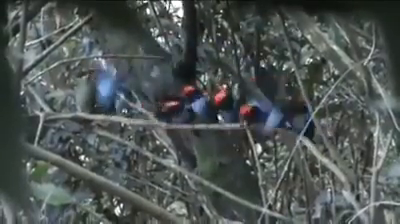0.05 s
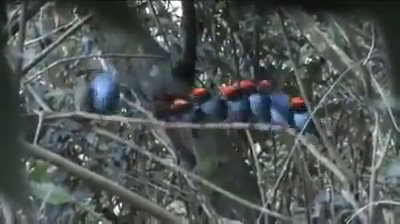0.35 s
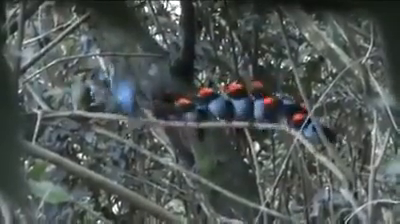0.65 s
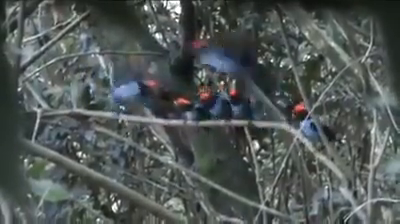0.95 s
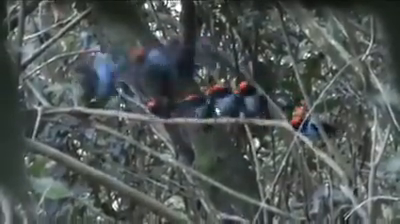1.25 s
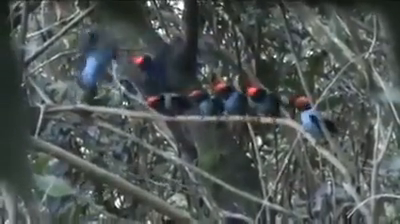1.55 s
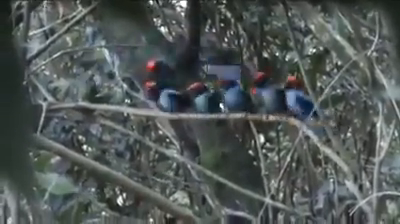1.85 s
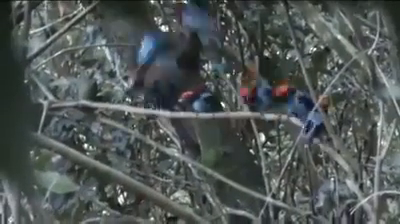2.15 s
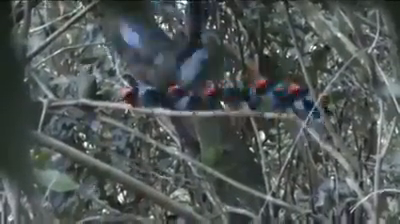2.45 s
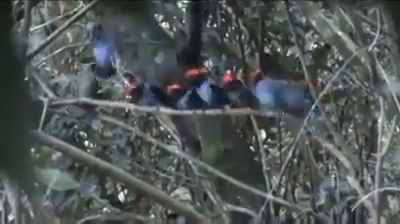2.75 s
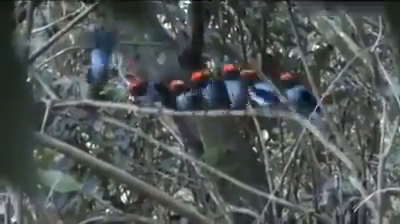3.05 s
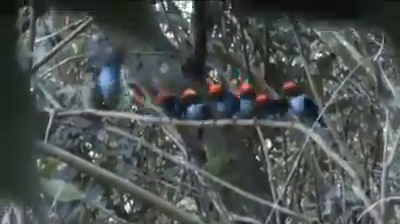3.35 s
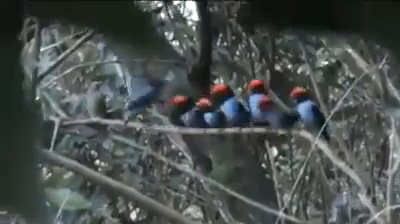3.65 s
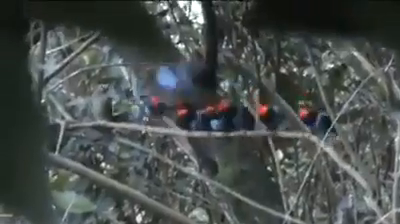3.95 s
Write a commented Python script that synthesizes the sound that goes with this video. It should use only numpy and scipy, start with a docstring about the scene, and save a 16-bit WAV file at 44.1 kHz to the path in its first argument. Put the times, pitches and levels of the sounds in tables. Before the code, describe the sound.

Harsh, buzzy bird calls trade with short hisses in a quick rhythm, thicken into an overlapping chorus with whirring wings, then separate again. Occasional high chips stand out, with slight woodland echo and a soft rush of air behind.

```python
"""Small birds displaying in woodland

Birds on a branch alternate a sharp hiss and a buzzy rasp about ten times a second. A rasp is a
train of pulses ringing in the throat; a hiss is noise with a tiny squeak inside. In the middle the
birds flutter up and their rasps overlap into a chorus. A few piercing chips cut through.
Trunks and leaves scatter the calls, and a faint far hum swells behind the steady air."""
import sys
import numpy as np
from scipy import signal
from scipy.fft import rfft, irfft
from scipy.io import wavfile

SR = 44100
rng = np.random.default_rng(int(sys.argv[2]) if len(sys.argv) > 2 else 0)


def to_wav(sig):
    """Store sig (one row per channel, or 1-D mono) as 16-bit WAV at the path in sys.argv[1].

    Samples outside -1..1 are clipped; the rate is SR.
    """
    pcm = np.clip(np.atleast_2d(sig), -1, 1) * 32767
    pcm = np.round(pcm).astype(np.int16)
    wavfile.write(sys.argv[1], SR, pcm.T)  # frames by channels


N = 176400
TIME = np.arange(N) / SR

# Levels in the tables are relative: they set the balance before mixing.
# The tone of the air. Each row: frequency in Hz, level in dB.
AIR_COLOUR = [(15, -6), (38, 6), (55, 1.5), (115, 1), (160, -2.5), (300, -0.5), (600, -3.5), (1200, -9.5),
              (3000, -3.5), (5000, -25), (8000, -18.5), (10500, -29.5)]
# How alike left and right sound. Each row: frequency in Hz, likeness from 0 to 1.
STEREO_LIKENESS = [(30, .98), (125, 0.95), (280, 0.53), (550, 0.57), (1200, 0.85), (3000, 0.91),
                   (8000, 0.57)]
# The swell of the far hum. Each row: time in seconds, level in dB.
HUM_LEVELS = [(0, -92), (.8, -74.5), (1.6, -71), (2.56, -59.5), (4, -58)]
# The tone of the feathers. Each row: frequency in Hz, level in dB.
WING_COLOUR = [(250, -20.5), (480, -18.5), (640, -5), (770, -12.5), (970, -5), (1130, -9.5), (1400, -0.5),
               (2200, -2.5), (2700, -6.5), (3600, -3), (4600, -9), (6500, -16), (8000, -18.5), (10500, -28)]
# How loudly the wings whir. Each row: time in seconds, level in dB.
WING_LEVELS = [(0, -44), (.9, -48), (1.01, -58), (1.08, -40), (1.2, -37), (1.34, -41.5), (1.55, -43.5),
               (1.85, -41), (1.96, -42), (2.28, -38), (2.45, -43), (2.8, -46.5), (3.02, -41), (3.3, -47),
               (3.65, -49), (3.8, -44), (3.89, -48), (3.96, -39), (4, -51)]
# The throat resonances of a rasp's low part. Each row: frequency in Hz, width in Hz, level in dB.
LOW_THROAT = [(1463, 460, -11), (2162, 534, -2), (3070, 650, -9), (5500, 2500, -19.5)]
# How loudly the other birds rasp. Each row: time in seconds, level in dB.
CHORUS_LEVELS = [(0, -46.5), (.9, -46), (1.02, -48.5), (1.15, -41.5), (1.25, -34.5), (1.45, -35),
                 (1.52, -38), (1.63, -36.5), (1.86, -39), (1.96, -48), (2.1, -40), (2.25, -41),
                 (2.53, -36.5), (2.72, -39), (2.81, -48.5), (3.2, -45.5), (3.6, -54), (4, -49)]
# The hisses. Each row: start in seconds, length in seconds, level in dB.
HISS_NOTES = [(0.016, 0.047, -35.5), (.1, 0.053, -38.5), (.188, 0.055, -37.5), (0.291, .05, -34),
              (0.391, 0.045, -33.5), (.498, 0.036, -32), (0.605, 0.036, -34.5), (0.707, 0.032, -33.5),
              (0.818, 0.041, -35.5), (1.179, 0.034, -38), (1.601, 0.041, -37), (1.649, 0.061, -43),
              (1.73, 0.054, -40), (1.898, 0.033, -45), (1.973, 0.037, -40.5), (2.04, 0.048, -44),
              (2.12, 0.05, -42.5), (2.21, 0.053, -43), (2.252, .05, -40), (2.318, 0.047, -38.5),
              (2.39, 0.047, -39.5), (2.465, 0.047, -42.5), (2.573, 0.049, -46), (2.809, 0.034, -41),
              (2.884, 0.053, -37), (2.981, 0.034, -35), (3.073, 0.04, -34.5), (3.171, 0.056, -34.5),
              (3.266, 0.052, -39), (3.357, 0.046, -40.5), (3.451, 0.047, -35.5), (3.555, 0.049, -35.5),
              (3.655, 0.048, -34.5), (3.747, 0.041, -37)]
# The tone of a hiss. Each row: frequency in Hz, level in dB.
HISS_COLOUR = [(900, -37), (1300, -16), (1700, -11.5), (2200, -20.5), (3000, -8), (4150, -19), (4700, -5.5),
               (5500, -0.5), (6750, -6), (7250, -12), (7900, -21.5), (10500, -36.5)]
# Resonances that whistle in a hiss. Each row: frequency in Hz, width in Hz, level in dB.
HISS_WHISTLES = [(5316, 200, -0.5), (6408, 250, -1.5)]
# The near rasps. Each row: start in seconds, length in seconds, low part in dB, bright ring in dB.
RASP_NOTES = [(0.034, 0.055, -47, -32.5), (.128, 0.052, -42, -34.5), (0.222, 0.059, -38, -33.5),
              (0.328, 0.053, -36.5, -32.5), (0.437, 0.046, -39.5, -32), (.543, 0.059, -40, -31),
              (0.653, 0.051, -38.5, -34), (0.753, 0.056, -39, -31), (0.865, 0.092, -38, -28.5),
              (1.19, 0.054, -42, -38), (1.267, 0.041, -43, -38.5), (1.312, 0.04, -50, -35),
              (1.363, 0.051, -40, -35.5), (1.456, 0.052, -44, -36), (1.526, 0.064, -38.5, -34.5),
              (1.672, 0.063, -36.5, -35.5), (1.752, .05, -43, -40), (1.811, 0.051, -37, -37),
              (1.877, 0.065, -37.5, -58), (1.988, 0.043, -44, -36.5), (2.035, 0.059, -52, -38),
              (2.136, 0.066, -51, -35.5), (2.195, 0.067, -48, -35.5), (2.265, 0.039, -46, -39),
              (2.341, 0.052, -45, -38.5), (2.407, .06, -40, -35), (2.474, 0.072, -47, -38),
              (2.544, .05, -46, -47), (2.732, 0.055, -41, -40), (2.833, 0.047, -40.5, -42),
              (2.925, 0.046, -38, -55), (3.019, 0.062, -38, -62), (3.117, 0.033, -36, -45),
              (3.211, 0.068, -42, -42), (3.298, 0.057, -39.5, -42), (3.393, 0.054, -40.5, -40.5),
              (3.497, 0.046, -39.5, -39.5), (3.6, 0.049, -39, -43), (3.701, 0.044, -40, -41),
              (3.78, 0.072, -39, -35)]
# The ring's pitch follows the bird's effort. Each row: ring level in dB, pitch in Hz.
RING_PITCHES = [(-42, 3030), (-39.5, 3320), (-36.5, 3720), (-34.5, 3376), (-23, 3500)]
# Chips and thin whistles. Each row: start in seconds, length in seconds, pitch in Hz, level in dB.
CHIP_NOTES = [(1.155, 0.052, 4580, -40), (1.185, 0.0354, 4687, -31.5), (2.843, 0.044, 4854, -30.5),
              (3.14, 0.039, 4650, -28.5), (3.947, 0.103, 2974, -42.5), (3.94, 0.1, 2140, -43)]
# The pure tones that make up a chip. Each row: multiple of the pitch, level in dB.
CHIP_PARTIALS = [(.5, -8), (1, 1), (1.5, -17.5), (2, -26.5)]

PULSE_HZ = 331.45  # typical pulse rate at the start of a rasp


def from_db(db):
    """Turn decibels into a number to multiply a sound by."""
    return 10 ** (np.asarray(db) / 20)


def rms_one(x):
    """Scale a sound so its average strength (rms) is one."""
    return x / np.sqrt(np.mean(x ** 2) + 1e-20)


def level(curve):
    """Join (seconds, dB) points into a volume curve."""
    return from_db(np.interp(TIME, *np.transpose(curve)))


def per_bin(points, size):
    """Read (Hz, value) points at every frequency of a spectrum."""
    hz, value = np.transpose(points)
    return np.interp(np.log(np.fft.rfftfreq(size, 1 / SR) + 1), np.log(hz), value)


def noise(colour, size):
    """Noise with its lows and highs shaped by a colour table."""
    spectrum = rfft(rng.standard_normal(size))
    return rms_one(irfft(spectrum * from_db(per_bin(colour, size)), size))


def wide_noise(colour):
    """Stereo noise whose sides are most alike in the bass."""
    alike = per_bin(STEREO_LIKENESS, N)
    mid = irfft(rfft(noise(colour, N)) * np.sqrt(1 + alike), N)
    side = irfft(rfft(noise(colour, N)) * np.sqrt(1 - alike), N)
    return rms_one(np.array([mid + side, mid - side]))


def wander(rate, t):
    """Random wavering that heads for a new value `rate` times a second."""
    knots = rng.standard_normal(int(t[-1] * rate) + 2)
    return np.interp(t * rate, np.arange(len(knots)), knots)


def add(out, start, sound):
    """Mix a sound in at its start time."""
    i = int(np.clip(start * SR, 0, N))
    out[i:i + len(sound)] += sound[:N - i]


def swell(t, rise_end, fall_start, end):
    """Fade in smoothly, hold, then fade out."""
    shape = np.clip(np.minimum(t / rise_end, (end - t) / (end - fall_start)), 0, 1)
    return np.sin(shape * np.pi / 2) ** 2


def sine(hz):
    """A pure tone that follows a changing pitch."""
    return np.sin(2 * np.pi * np.cumsum(hz) / SR)


def vary(hz, spread):
    """Nudge a frequency at random; a spread of 0.1 is about ten percent."""
    return hz * np.exp(spread * rng.standard_normal())


def far_hum():
    """A faint, slightly wavering tone that grows louder."""
    pitch_hz = 232 * (1 + 0.0021 * wander(10, TIME))
    return np.sqrt(2) * sine(pitch_hz) * level(HUM_LEVELS)


def air():
    """The soft, steady rush of woodland air."""
    return from_db(-53) * wide_noise(AIR_COLOUR)


def wings():
    """Feather noise throbbing with uneven wingbeats."""
    beat_hz = 32 * (1 + .2 * wander(10, TIME))
    throb = from_db(sine(beat_hz))  # 1 dB up and down
    return wide_noise(WING_COLOUR) * throb * level(WING_LEVELS)


def throat(x, resonances):
    """A throat favours a few bands of sound; each is filtered twice for steep edges."""
    out = 0
    for k, (hz, width, db) in enumerate(resonances):
        r = np.exp(-np.pi * width / SR)
        b = (1 - r * r) / 2 * np.array([1, 0, -1])
        a = [1, -2 * r * np.cos(2 * np.pi * hz / SR), r * r]
        band = signal.lfilter(b, a, signal.lfilter(b, a, x))
        out = out + (-1) ** k * from_db(db) * band
    return rms_one(out)


def rasp(length, low_db, ring_db, pulse_hz, ring_hz):
    """One buzz: pulses first sound the low throat, then each becomes a burst of bright tone."""
    t = np.arange(SR // 7) / SR
    progress = t / length
    slowing = .5 * np.clip((progress - .6) / .4, 0, 1)  # down to half speed late in the note
    jitter = 1 + .025 * wander(300, t)
    phase = np.cumsum(pulse_hz * (1 - slowing) * jitter) / SR + rng.random()
    cycle = np.floor(phase).astype(int)
    pulses = np.diff(cycle, prepend=0)
    size, detune = rng.standard_normal((2, len(t)))[:, cycle]  # every pulse is a little different
    strength = from_db(2 * size)
    breath = rng.standard_normal(len(t)) * np.exp(-3 * (phase % 1))  # a puff after each pulse
    low = throat(rms_one(pulses * strength) + 0.21 * rms_one(breath), LOW_THROAT)
    low *= swell(progress, rise_end=.25, fall_start=.41, end=.88)
    since_pulse = t - np.maximum.accumulate(t * pulses)
    tone = np.sin(2 * np.pi * ring_hz * (1 + 0.035 * detune) * since_pulse)
    bursts = swell(since_pulse, rise_end=0.00074, fall_start=0.00074, end=0.0033)
    ring = rms_one(strength * tone * bursts)
    ring *= swell(progress, rise_end=.41, fall_start=.52, end=1.27)
    return from_db(low_db) * low + from_db(ring_db - 1) * ring


def chorus():
    """Other birds rasp over one another, each at its own pulse rate."""
    out = np.zeros(N)
    notes_per_s = 38
    for slot in np.arange(0, TIME[-1], 1 / notes_per_s):
        ring_hz, pulse_hz = vary(3666, spread=0.098), vary(PULSE_HZ, spread=.17)
        start = slot + rng.uniform(-.5, .5) / notes_per_s
        add(out, start, rasp(length=.06, low_db=-3.5, ring_db=0, pulse_hz=pulse_hz, ring_hz=ring_hz))
    return rms_one(out) * level(CHORUS_LEVELS)


def hisses():
    """Sudden bursts of grainy, whistling noise, each with a small rising squeak inside."""
    out, t = np.zeros(N), np.arange(SR // 10) / SR
    squeak_s, squeak_delay_s, squeak_db, whistle_db = 0.0169, 0.002974, -9, -6.5
    squeak_hz = np.interp(t, [0, squeak_s], [1174, 1740])
    squeak = np.sqrt(2) * sine(squeak_hz) * swell(t, squeak_s / 4, squeak_s / 2, squeak_s)
    for start, length, db in HISS_NOTES:
        grain = from_db(wander(800, t))  # the level flickers by about 1 dB
        resonances = [(vary(hz, spread=0.066), width, gain) for hz, width, gain in HISS_WHISTLES]
        whistle = from_db(whistle_db) * throat(rng.standard_normal(len(t)), resonances)
        hiss = rms_one(noise(HISS_COLOUR, len(t)) * grain + whistle)
        fade = swell(t, rise_end=0.0065, fall_start=0.49 * length, end=length)
        add(out, start, from_db(db) * hiss * fade)
        add(out, start + squeak_delay_s, from_db(db + squeak_db) * squeak)
    return out


def near_rasps():
    """The nearest birds rasp, their effort setting the pitch of the ring."""
    out = np.zeros(N)
    for start, length, low_db, ring_db in RASP_NOTES:
        ring_hz = np.interp(ring_db, *np.transpose(RING_PITCHES))
        add(out, start, rasp(length, low_db, ring_db, PULSE_HZ, vary(ring_hz, spread=0.02)))
    return out


def chips():
    """Short, unsteady whistles that rise a little and have a rough, noisy edge."""
    out, t = np.zeros(N), np.arange(SR // 8) / SR
    edge_db, edge_width = -4.5, 0.48  # the width is a share of the pitch
    for start, length, hz, db in CHIP_NOTES:
        wobble = 0.026 * wander(700, t)
        rise = 0.056 * (t / length - .5)
        pitch = hz * (1 + rise + wobble)
        tone = rms_one(sum(from_db(gain) * sine(k * pitch) for k, gain in CHIP_PARTIALS))
        edge = from_db(edge_db) * throat(rng.standard_normal(len(t)), [(hz, edge_width * hz, 0)])
        fade = swell(t, rise_end=0.0028, fall_start=0.32 * length, end=length)
        add(out, start, from_db(db) * (tone + edge) * fade)
    return out


def woodland(x):
    """Add quick echoes off branches and trunks, then a faint, blurred tail."""
    t = np.arange(SR // 2) / SR
    echoes_per_s = 900
    early_fade_s, early_db, early_width = 0.21, -2.5, 0.27  # a fade is the time to drop 60 dB
    tail_fade_s, tail_db, tail_width = 0.62, -10.5, 0.89
    arrivals = rng.random((2, len(t))) < echoes_per_s / SR
    early = rng.choice([-1, 1], arrivals.shape) * arrivals * from_db(-60 * t / early_fade_s)
    tail = rng.standard_normal(arrivals.shape) * from_db(-60 * t / tail_fade_s)
    response = 0
    for echoes, db, width in ((early, early_db, early_width), (tail, tail_db, tail_width)):
        mid, side = from_db(db) * echoes / np.linalg.norm(echoes, axis=1, keepdims=True)
        response = response + np.array([mid + width * side, mid - width * side])
    return x + signal.fftconvolve(x[None], response, axes=1)[:, :N]


def scene():
    """Mix hum, air and wings with the calls; only the calls echo."""
    backdrop = far_hum() + air() + wings()
    calls = near_rasps() + hisses() + chips() + chorus()
    return backdrop + woodland(from_db(-2) * calls)


def record(dry):
    """Cut away the highest treble steeply."""
    cutoff_hz = 10700
    return signal.sosfilt(signal.ellip(12, .1, 80, cutoff_hz, fs=SR, output="sos"), dry)


dry = scene()
out = record(dry)
to_wav(out)
```